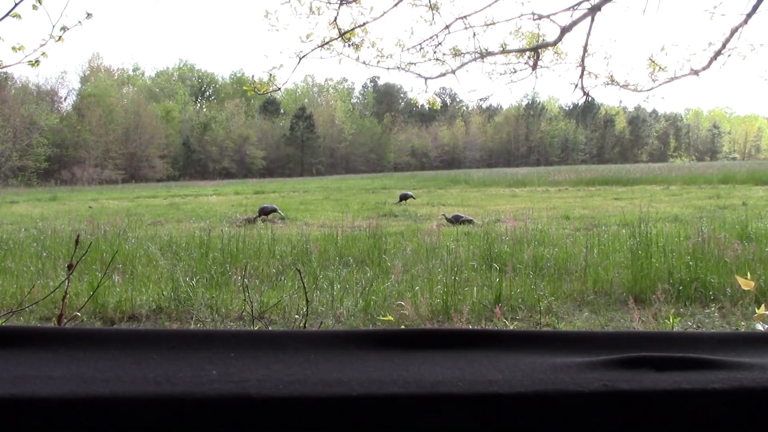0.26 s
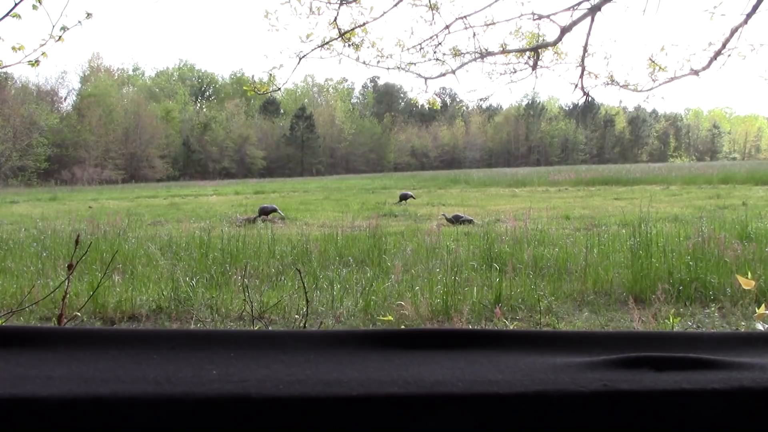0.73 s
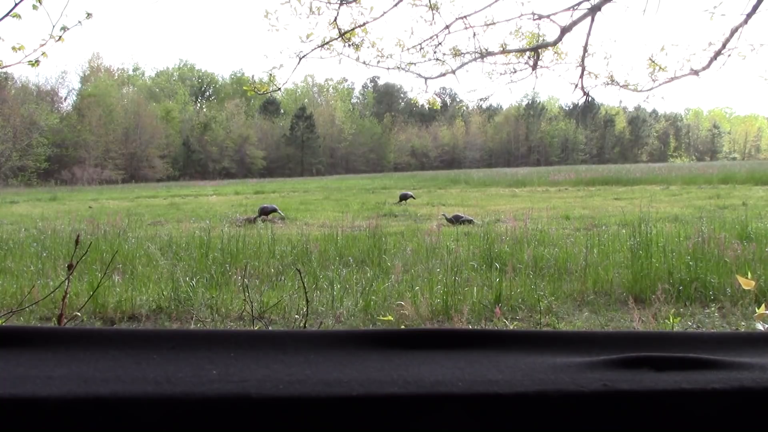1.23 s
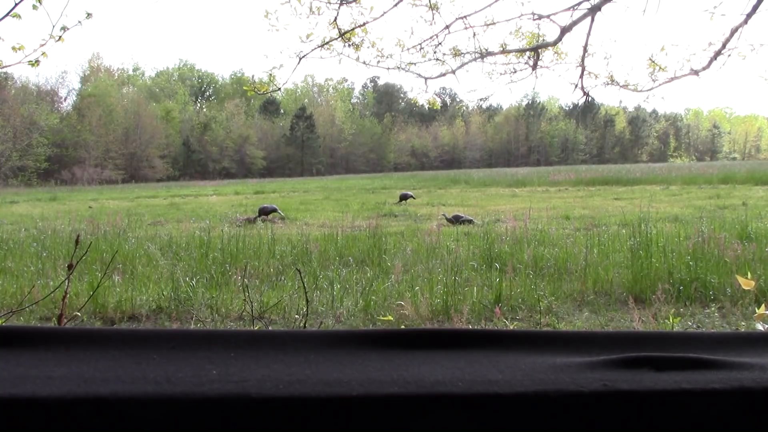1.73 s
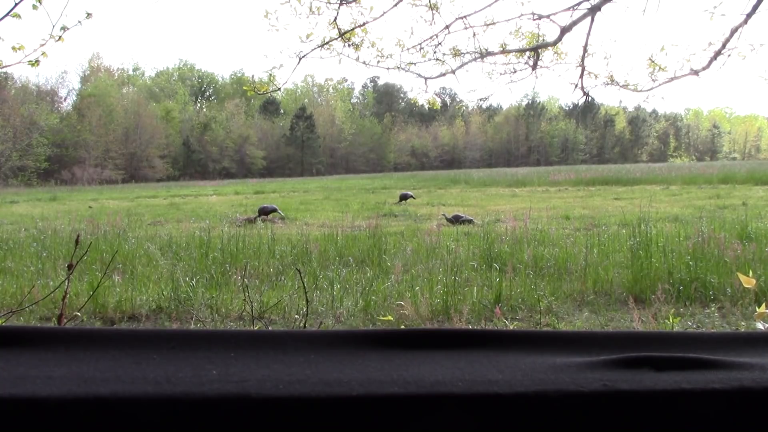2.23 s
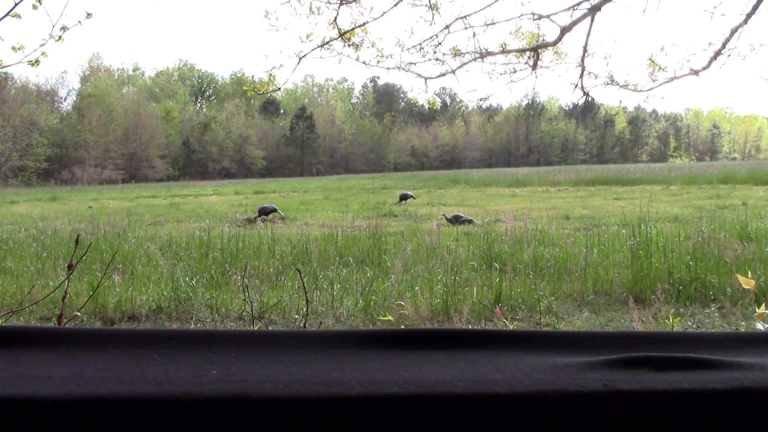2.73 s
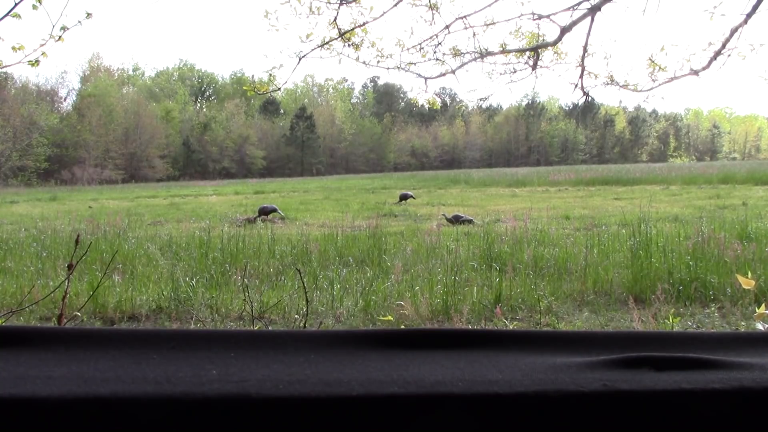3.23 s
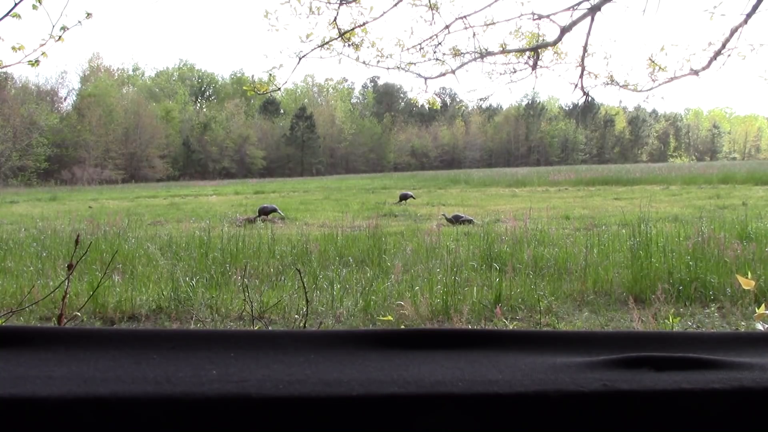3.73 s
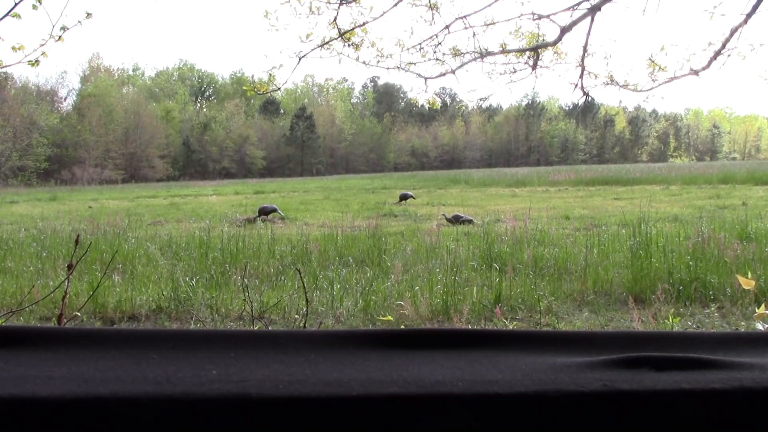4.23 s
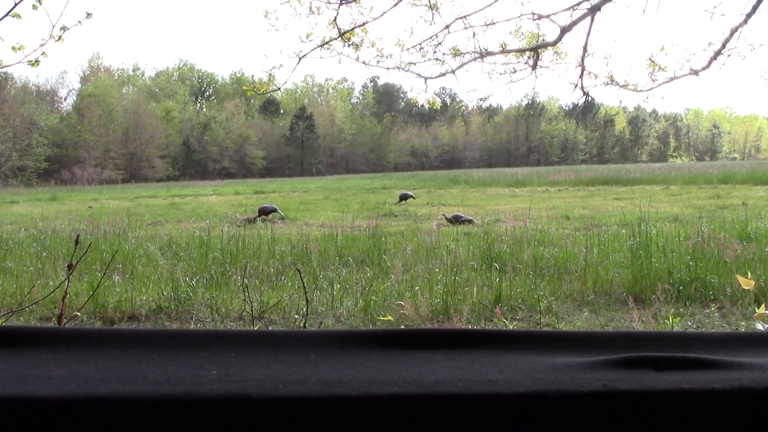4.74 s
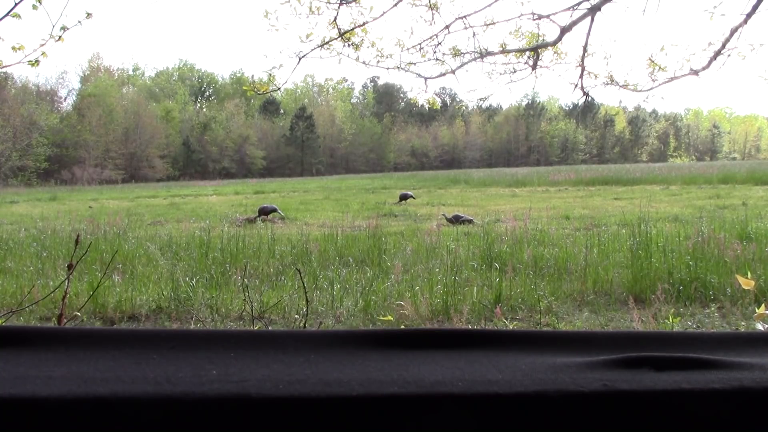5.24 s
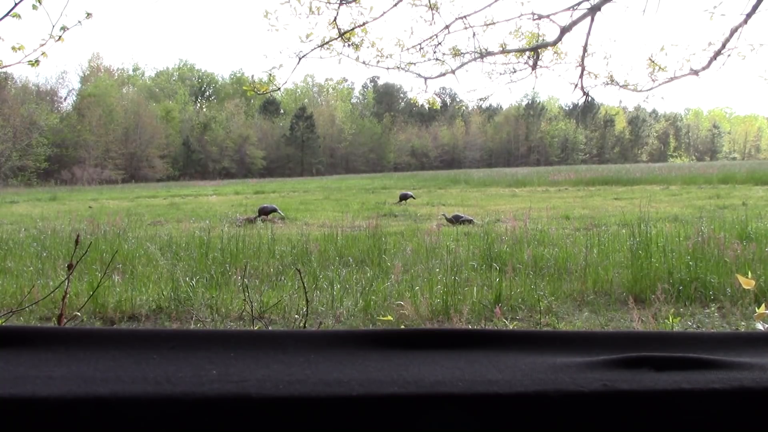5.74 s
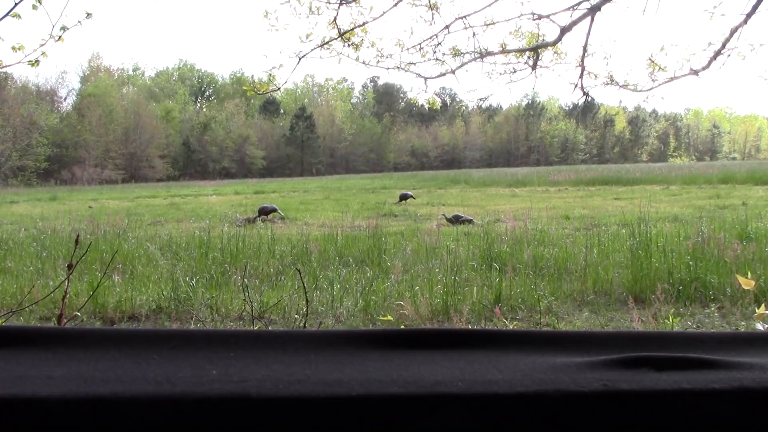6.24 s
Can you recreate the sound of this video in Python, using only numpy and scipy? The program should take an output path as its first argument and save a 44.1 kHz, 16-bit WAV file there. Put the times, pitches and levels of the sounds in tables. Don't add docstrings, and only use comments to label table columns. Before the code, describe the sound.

Near the microphone at a field edge, a turkey clucks once, then yelps singly and in quick pairs, six very short, throaty, hollow notes. Tiny faint whines slip between them, and a soft purr of slowing beats rolls after the fourth yelp. Tight, dulled echoes follow each yelp, with weak later returns from the trees. Underneath are a thin high katydid buzz, faint ticking frog and soft air hiss.

```python
import sys
import numpy as np
from scipy import signal
from scipy.io import wavfile
from scipy.ndimage import uniform_filter1d

SR = 44100
rng = np.random.default_rng(int(sys.argv[2]) if len(sys.argv) > 2 else 0)


def master_out(mix):
    frames = np.transpose(np.atleast_2d(mix))
    ceiling = np.clip(frames, -1, 1)
    pcm = np.round(ceiling * 32767).astype(np.int16)
    wavfile.write(sys.argv[1], SR, pcm)


def undo_db(level):
    steps = np.asarray(level, float) / 20
    return 10 ** steps


N = 285327


def evened(x):
    return x / np.sqrt(np.mean(x ** 2) + 1e-20)


def read(points, hz):
    f, value = np.transpose(points)
    return np.interp(np.log(hz + 1), np.log(f + 1), value)


def add(mix, start_s, sound):
    part = mix[round(start_s * SR):][:len(sound)]
    part += sound[:len(part)]


def causal(points):
    log_gain = read(points, abs(np.fft.fftfreq(2048, 1 / SR))) * np.log(10) / 20
    return np.fft.ifft(np.exp(np.conj(signal.hilbert(log_gain)))).real[:600]


def turkey():
    # start in seconds, length in seconds, peak effort in dB, lowest pitch in Hz,
    # share of the length where the pitch is lowest.
    yelps = [
        (0.566, .064, -21, 664.8, .6),
        (1.717, .064, -17, 613.9, .44),
        (2.23, .067, -19, 611.5, .5),
        (3.76, 0.074, -21, 625.9, .4),
        (5.482, 0.069, -20, 612.4, .3),
        (5.8635, .077, -16.5, 600.8, .42),
    ]
    # start in seconds, length in seconds, effort in dB, second harmonic in Hz at start, at end.
    whines = [
        (1.205, 0.022, -45, 1263, 1150),
        (1.376, 0.042, -54.5, 1203, 1160),
        (3.008, 0.037, -46, 1138, 1070),
        (3.066, .044, -51, 1090, 1190),
        (5.311, .016, -56, 1117, 1150),
        (6.377, 0.014, -53, 1070, 1150),
    ]
    # start in seconds, level in dB.
    clucks = [
        (0.1212, -26),
        (2.408, -38.5),
    ]
    cluck_modes = [(1240, 507, -1), (2220, 630, -6.5), (2780, 2400, -16)]  # Hz, width in Hz, dB
    out = np.zeros(N)
    for row in yelps:
        add(out, *call(yelp(*row), divide=0.99))
    for row in whines:
        add(out, *call(whine(*row), divide=2, brighten=.6, wobble=.02))
    for start_s, db in clucks:
        add(out, start_s, undo_db(db + 5.5) * ring(cluck_modes, rise_s=0.00099))
    return out


def yelp(start_s, length_s, db, low_hz, low_share):
    # place (-1 start, 0 lowest pitch, 1 end), level in dB re peak, pitch factor.
    shape = [
        (-1, -29, 1.1),
        (-.85, -8.5, 1.14),
        (-.6, -5, 1.022),
        (0, -0.46, 1.0),
        (.42, -3.5, 1.04),
        (.57, -5, 1.13),
        (.76, -11, 1.217),
        (0.82, -27, 1.42),
    ]
    place, under_db, factor = np.transpose(shape)
    share = low_share + place * np.where(place < 0, low_share, 1 - low_share)
    return np.transpose([start_s + length_s * share, db + under_db, low_hz * factor])


def whine(start_s, length_s, db, first_hz, last_hz):
    rise_s, fall_s, edge_db, swell_db_per_octave = .008, .005, -24, 47
    s = start_s + np.array([0, rise_s, length_s - fall_s, length_s])
    climb_octaves = max(np.log2(last_hz / first_hz), 0)
    swell_db = swell_db_per_octave * climb_octaves * np.array([-0.6, -.5, 0.57, .5])
    edges_db = edge_db * np.array([1, 0, 0, 1])
    return np.transpose([s, db + swell_db + edges_db, np.interp(s, s[[0, -1]], [first_hz, last_hz])])


def call(rows, divide, brighten=.4, wobble=.002):
    # frequency in Hz, level in dB.
    throat = [(450, -44.5), (680, -19.5), (880, -5.5), (1150, -2), (1300, -2), (1550, 2), (1850, -17.5),
              (2150, -9.5), (2450, -1), (2800, -18), (3200, -22.5), (4200, -44.5), (4950, -24.5),
              (7000, -60)]
    # frequency in Hz, level in dB.
    breath = [(500, -36), (900, -7), (1300, -4), (2500, 0), (3500, -14), (5000, -13), (7500, -26),
              (10000, -55)]
    breath_db, shimmer_db, crest_rad = -26.5, .55, 4.6
    s, effort_db, hz = np.transpose(rows)
    t = np.arange(s[0], s[-1], 1 / SR)
    effort_db = uniform_filter1d(np.interp(t, s, effort_db), size=120)
    hz = uniform_filter1d(np.interp(t, s, hz), size=160) / divide
    chance = rng.standard_normal((4000, 2))[:len(t)]
    hz = hz * (1 + wobble * evened(uniform_filter1d(chance[:, 0], size=90)))
    turns = np.cumsum(hz) / SR

    k = np.arange(1, 15)[:, None]
    octaves_up = np.log2(np.maximum(k / 2, 1))
    partial_db = read(throat, k * hz) + brighten * (effort_db + 20) * octaves_up
    partial_db = uniform_filter1d(partial_db, size=50, axis=1)
    shimmer = rng.standard_normal((4000, len(k)))[:len(t)].T
    shimmer = evened(signal.fftconvolve(shimmer, np.hanning(240)[None], "same", axes=1))
    partial_db = partial_db + shimmer_db * np.sqrt(k) * shimmer
    tone = np.sum(undo_db(partial_db) * np.cos(2 * np.pi * k * turns + crest_rad), axis=0)

    air = evened(signal.fftconvolve(chance[:, 1], causal(breath))[:len(t)])
    air = undo_db(breath_db + .5 * (effort_db + 22)) * air
    return s[0], undo_db(effort_db) * (np.sqrt(2) * tone + air)


def ring(modes, rise_s):
    t = np.arange(900) / SR
    body = sum(undo_db(db) * np.sin(2 * np.pi * hz * t) * np.exp(-np.pi * width_hz * t)
               for hz, width_hz, db in modes)
    body = body * (1 - np.exp(-t / rise_s)) ** 2
    body = signal.sosfilt(signal.butter(2, 650, "high", fs=SR, output="sos"), body)
    return body / abs(body).max()


def space(x):
    # delay in milliseconds, signed gain.
    near_echoes = [(2.24, -0.25), (3.79, -0.15), (4.47, -0.8), (5.71, 0.45), (6.1, -0.37), (6.53, 0.44),
                   (7.51, 0.1), (8.14, 0.5), (8.84, 0.25), (10.07, 0.23), (11.59, 0.32), (12.65, -0.15),
                   (13.97, -0.1), (15.56, -0.18), (16.78, 0.1), (19.86, -0.14)]
    # delay in seconds, level in dB, spread in seconds.
    tree_echoes = [
        (.055, -36.5, .02),
        (.105, -44, .014),
        (.145, -38.5, .016),
        (.195, -42, .016),
        (.28, -49, .02),
    ]
    # frequency in Hz, left minus right in dB.
    beak_pan = [(300, -.5), (1300, -2.2), (2400, .6), (4400, 2.6), (8000, -1)]
    tree_colour = [(800, -3), (1300, 3), (2500, -6), (5000, -1), (9000, -14)]  # Hz, dB
    t = np.arange(SR // 2) / SR
    echoes = np.zeros(len(t))
    for ms, gain in near_echoes:
        echoes[round(ms * SR / 1000)] += gain
    leaves = rng.standard_normal((len(t), 2)).T
    leaves = .8 * leaves[0] + .5 * leaves[1] * np.array([[1], [-1]])
    tail = undo_db(-30.5 - 60 * t / 0.096) * (t > .016) * signal.lfilter([.2], [1, -.9], leaves)

    thin = signal.firwin(301, 850, pass_zero=False, fs=SR)
    close = signal.fftconvolve(echoes + tail, thin[None], "same", axes=1)
    dull = signal.fftconvolve(close, signal.firwin(101, 1900, fs=SR)[None], "same", axes=1)
    paths = (t == 0) + .55 * dull + .45 * close
    sides = [causal([(hz, sign * db / 2) for hz, db in beak_pan]) for sign in (1, -1)]
    x_close = signal.fftconvolve(x[None], signal.fftconvolve(paths, sides, axes=1), axes=1)[:, :N]

    late = sum(undo_db(db) / np.sqrt(spread_s * SR) * np.exp(-.5 * ((t - delay_s) / spread_s) ** 2)
               for delay_s, db, spread_s in tree_echoes)
    far = signal.fftconvolve(late * leaves, causal(tree_colour)[None], axes=1)
    sway = evened(uniform_filter1d(rng.standard_normal((N, 2)).T, size=150, axis=1))
    x_far = signal.fftconvolve(x[None], far, axes=1)[:, :N] * (.6 + .8 * sway)
    return x_close + x_far


def purr():
    # frequency in Hz, width in Hz, level in dB.
    purr_modes = [(950, 380, 0), (1800, 550, -8)]
    beats, start_s, gap_s, slowing_s = 24, 3.885, .0405, 1.12e-4
    base_db, ends_db, last_db, uneven_db = -40, -2.5, -10, 1
    out, beat = np.zeros(N), np.arange(beats)
    chance = rng.standard_normal((beats, 2))
    level_db = base_db + ends_db * (2 * beat / beat[-1] - 1) ** 2
    level_db = level_db + last_db * (beat == beat[-1]) + uneven_db * chance[:, 0]
    times_s = start_s + gap_s * beat + slowing_s * beat ** 2
    for s, db, bend in zip(times_s, level_db, chance[:, 1]):
        modes = [(hz * (1 + .015 * bend), width_hz, d) for hz, width_hz, d in purr_modes]
        add(out, s, undo_db(db) * ring(modes, rise_s=0.004))
    return out


def frog():
    # frequency in Hz, width in Hz, level in dB.
    tick_modes = [(1500, 450, -4), (1950, 450, 0), (2550, 500, -4)]
    # time into the call in seconds, level in dB.
    ticks = [
        (0, -2),
        (.034, 0),
        (.0675, -2),
        (.101, 0),
    ]
    # time in seconds, level in dB.
    loudness = [
        (0, -53.5),
        (1.8, -56.5),
        (2.06, -48.5),
        (2.3, -56.5),
        (2.6, -52),
        (3.1, -55),
        (4.8, -53),
        (5.25, -51.5),
        (5.5, -59),
        (6.47, -55),
    ]
    start_s, every_s, jitter_s, uneven_db = -.0765, .15017, .0015, 2.1
    out = np.zeros(N)
    into_s, tick_db = np.transpose(ticks)
    calls_s, tick = np.arange(start_s, N / SR, every_s), ring(tick_modes, rise_s=.0007)
    chance = rng.standard_normal((len(calls_s), len(into_s), 2))
    times_s = calls_s[:, None] + into_s + jitter_s * chance[..., 0]
    level_db = np.interp(times_s, *np.transpose(loudness)) + tick_db + uneven_db * chance[..., 1]
    for s, db in zip(times_s[times_s > 0], level_db[times_s > 0]):
        add(out, s, undo_db(db) * tick)
    return out


def smeared(x):
    t = np.arange(3000) / SR
    smear = rng.standard_normal((len(t), 2)).T * undo_db(-31 - 60 * t / 0.14) * (t > .003)
    return x + signal.fftconvolve(x[None], smear, axes=1)[:, :N]


def katydid(strokes_per_s, pitch, db):
    # share of the cycle, tooth rate in Hz, level in dB.
    stroke = [
        (.2, 8900, -36),
        (.27, 9340, 2),
        (.36, 9590, 2),
        (.5, 9843, 2.5),
        (.64, 9527, 3.5),
        (.74, 8856, -4.5),
        (.84, 8104, -26.5),
    ]
    share, hz, stroke_db = np.transpose(stroke)
    cycle = np.arange(N) / SR * strokes_per_s % 1
    jitter, flutter = rng.standard_normal((N, 2)).T
    tooth_hz = pitch * np.interp(cycle, share, hz) + 50 * evened(uniform_filter1d(jitter, size=60))
    flutter_db = 1.9 * evened(uniform_filter1d(flutter, size=80))
    level_db = db + np.interp(cycle, share, stroke_db) + flutter_db
    return undo_db(level_db) * np.sin(2 * np.pi * np.cumsum(tooth_hz) / SR)


def insects():
    # time in seconds, level in dB.
    near_level = [
        (0.0, -65),
        (0.03, -63.5),
        (1.24, -61.5),
        (1.44, -64),
        (1.96, -62),
        (2.72, -64),
        (3.01, -62.5),
        (4.65, -63.5),
        (6.09, -60.5),
        (6.47, -62),
    ]
    # strokes per second, pitch factor, level in dB.
    neighbours = [(61.7, .93, -66.5), (59, .9, -69)]
    cricket_line = (5570, 40, -86)
    # frequency in Hz, level in dB per Hz.
    chorus = [(6500, -37.5), (8000, -18.5), (8800, 2), (9500, 5), (9900, -5), (10300, -16), (11000, -45)]
    near_db = 5 + np.interp(np.arange(N) / SR, *np.transpose(near_level))
    near = katydid(58.492, 1, near_db) * undo_db([[-.6], [.6]])
    a, b = (katydid(*row) for row in neighbours)
    farther = a * undo_db([[-2.5], [2.5]]) + b * undo_db([[1.5], [-1.5]])
    hz, waver_hz, db = cricket_line
    waver = waver_hz * evened(uniform_filter1d(rng.standard_normal(N), size=300))
    cricket = undo_db(db) * np.sin(2 * np.pi * np.cumsum(hz + waver) / SR)
    return near + farther + cricket + hiss(chorus, -62, patchy_db=-1.7)


def air_hiss():
    # frequency in Hz, level in dB per Hz.
    air_colour = [(18, -70.5), (50, -36.5), (66, -2), (108, -2.5), (173, -3.5), (400, -3), (800, -5.5),
                  (1300, -10.5), (1800, -11), (3060, -18.5), (5000, -17.5), (7000, -24.5), (10700, -28.5),
                  (15500, -39)]
    return hiss(air_colour, -58, patchy_db=0.82)


def hiss(points, db, patchy_db):
    # frequency in Hz, left-right likeness.
    likeness = [(25, .85), (60, .97), (140, .76), (290, .56), (640, .62), (1410, .7), (3100, .72),
                (6820, .95), (15000, .995)]
    frames, hz = N // 256 + 5, np.fft.rfftfreq(1024, 1 / SR)
    a, b, c, d, patches = rng.standard_normal((frames, 513, 5)).T
    patches = uniform_filter1d(patches, size=12, axis=0)
    patches = evened(uniform_filter1d(patches, size=14, axis=1))
    same = np.clip(read(likeness, hz), -1, 1)[:, None]
    left = a + 1j * b
    right = same * left + np.sqrt(1 - same ** 2) * (c + 1j * d)
    z = np.array([left, right]) * undo_db(read(points, hz)[:, None] + patchy_db * patches)
    return undo_db(db) * evened(signal.istft(z, nperseg=1024, noverlap=768)[1][:, :N])


def scene():
    return space(turkey()) + smeared(purr() + frog()) + insects() + air_hiss()


def roll_off(x):
    return signal.sosfilt(signal.butter(12, 15630, fs=SR, output="sos"), x)


def record(dry):
    bent = dry + .6 * np.maximum(-dry - .62, 0) ** 2
    return roll_off(bent)


dry = scene()
out = record(dry)
master_out(out)
```